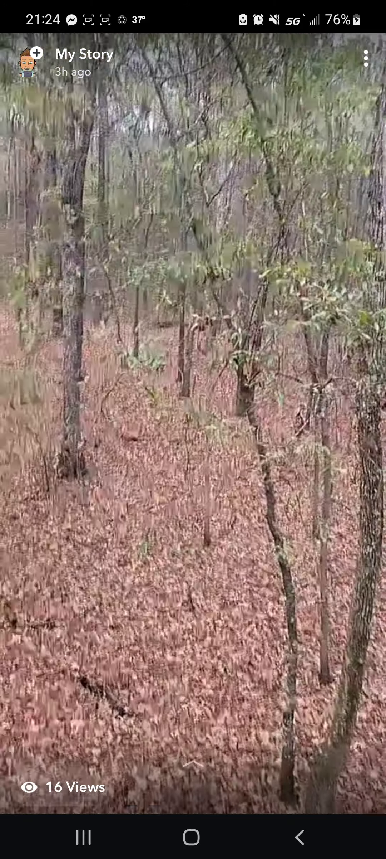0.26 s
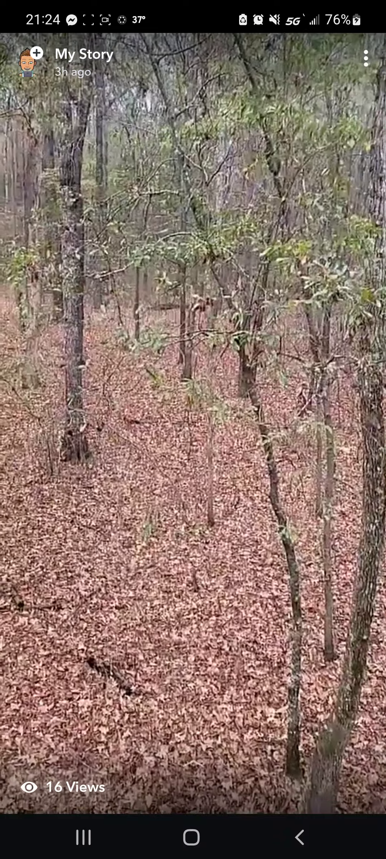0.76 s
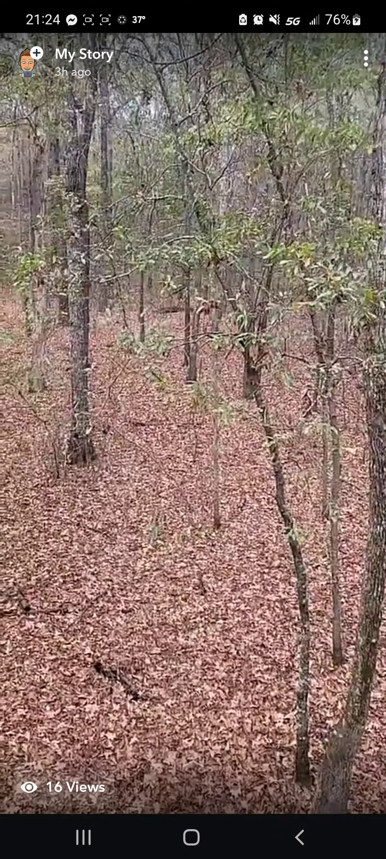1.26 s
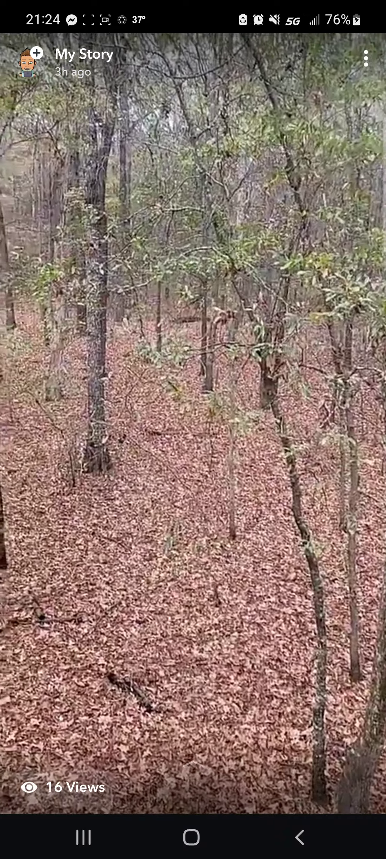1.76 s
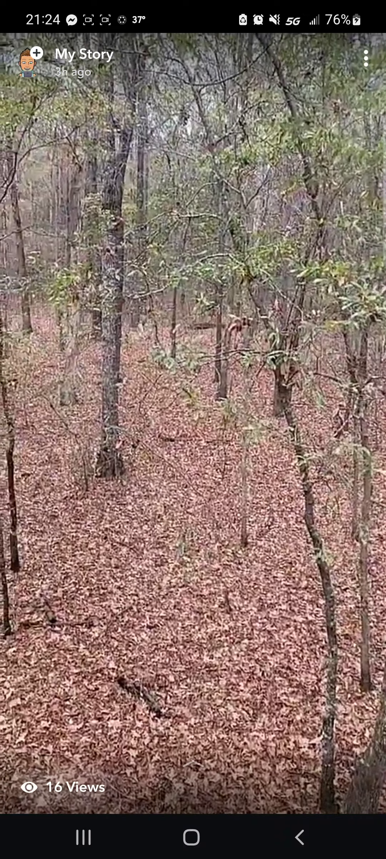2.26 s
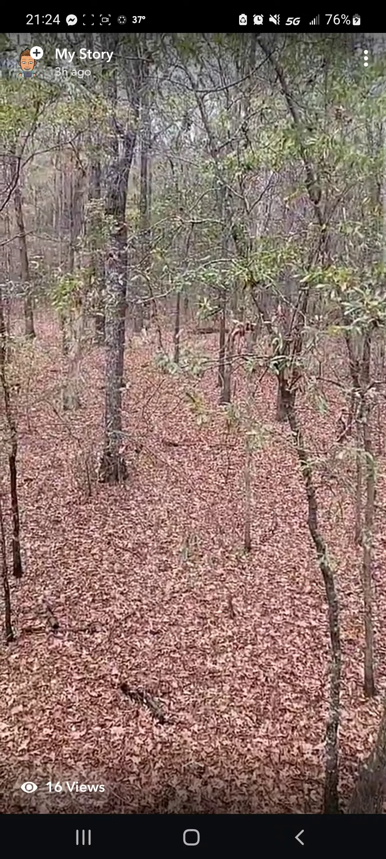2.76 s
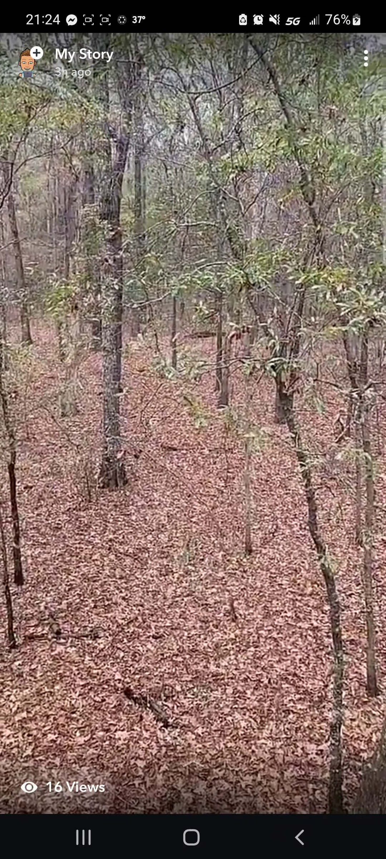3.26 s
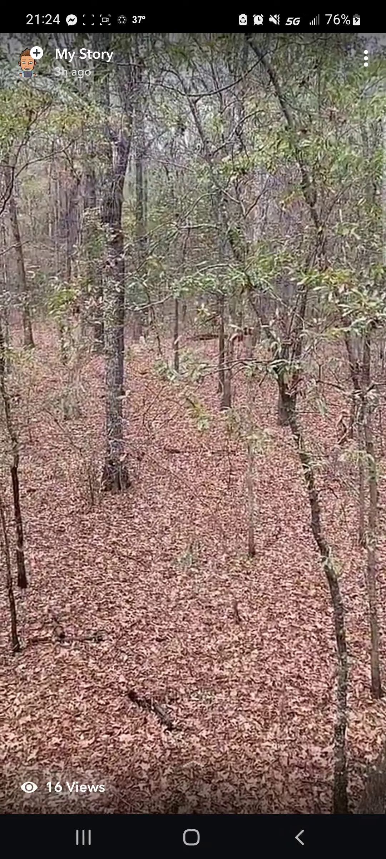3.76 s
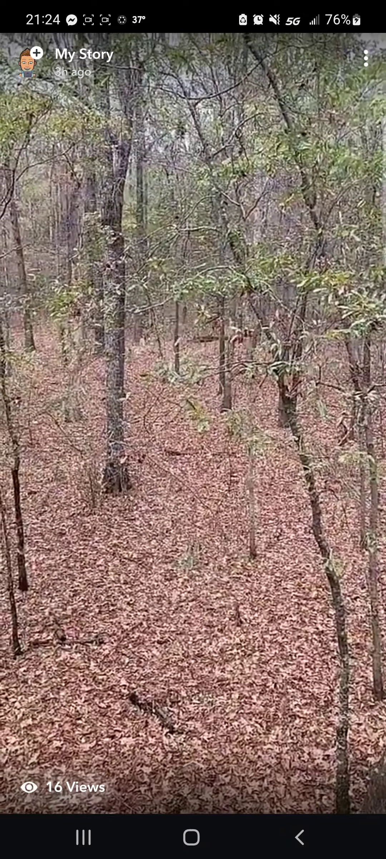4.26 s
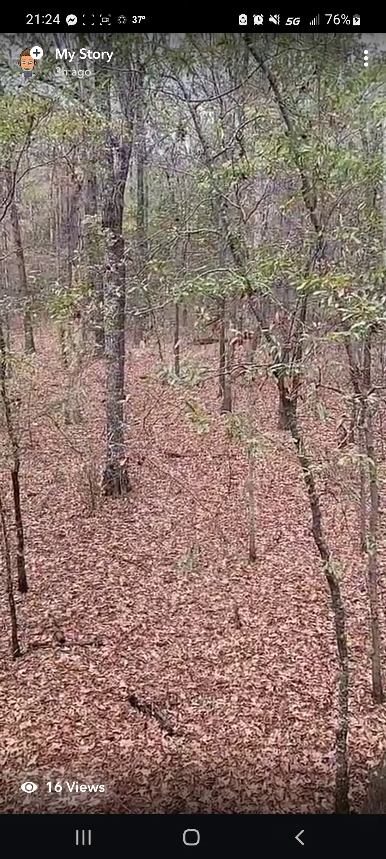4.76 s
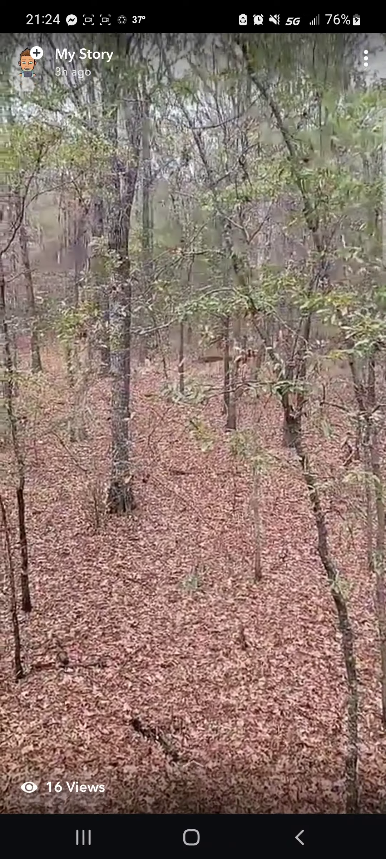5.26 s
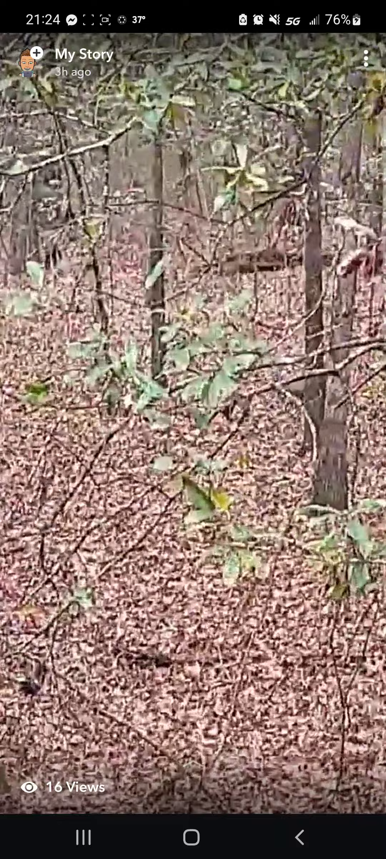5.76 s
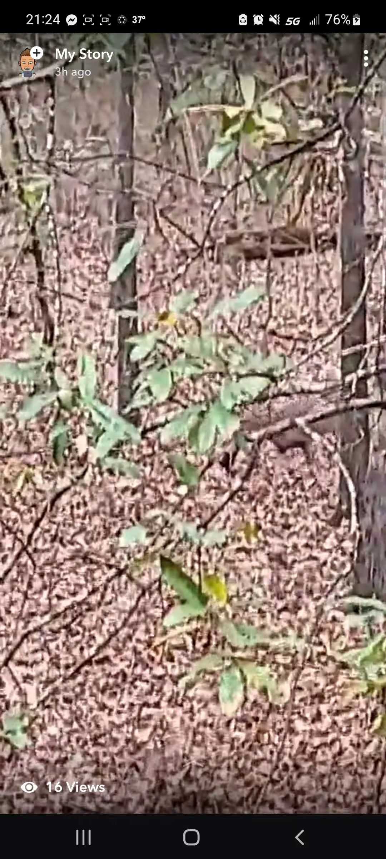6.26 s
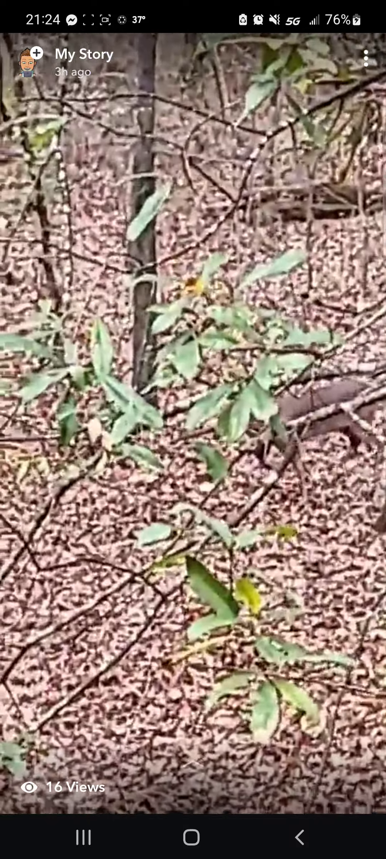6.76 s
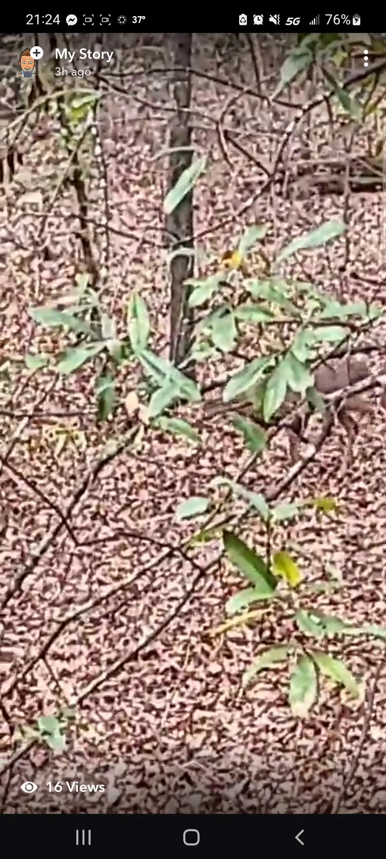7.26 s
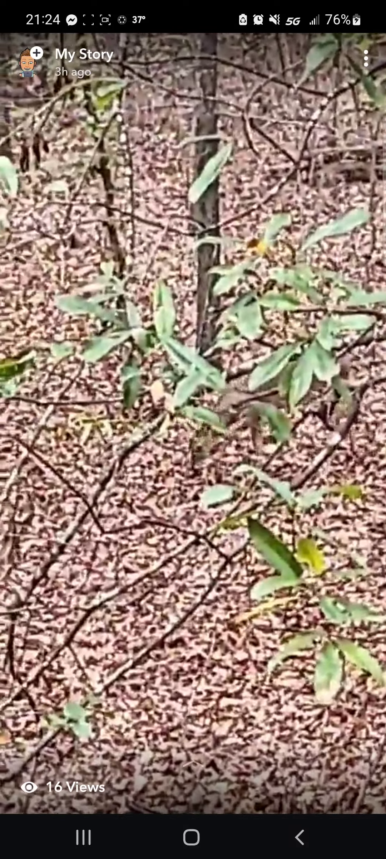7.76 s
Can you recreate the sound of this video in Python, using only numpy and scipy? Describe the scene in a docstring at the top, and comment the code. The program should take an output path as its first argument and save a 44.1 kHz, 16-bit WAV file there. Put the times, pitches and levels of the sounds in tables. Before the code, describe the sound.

After a brief silence, muffled finger taps and rubbing on a hand-held phone open the sound. Then a small animal chips sharply about once a second, seven times, each a very short high whistle with a dropping hook and a diffuse echo from tree trunks. Faint rumble and hiss lie underneath, with slight leaf rustle and a harder cluster of knocks just after five seconds.

```python
"""Sharp chips of a small animal, about one a second in an autumn wood, each with a short scattered tail.
Each chip is a swept sine with overtones and noise puffs; the trunks' echo is a convolution with decaying noise.
Farther whistles and soft hushing bands glide; fingers tap (damped sines and ticks) and rub a hand-held phone.
Dry leaves rustle as uneven noise grains; a far rumble and a faint hiss, both coloured noise, lie underneath.
The sound opens after a silence, with the treble and the full bass joining late."""
import sys
import numpy as np
from scipy import signal
from scipy.fft import rfft, irfft
from scipy.io import wavfile
from scipy.ndimage import uniform_filter1d

SR = 44100
rng = np.random.default_rng(int(sys.argv[2]) if len(sys.argv) > 2 else 0)


def materialize(psi):
    """Save the field psi as 16-bit PCM at rate SR to the path in sys.argv[1].

    A 1-D psi becomes a single channel; in a 2-D psi each row is a channel.
    """
    bounded = np.clip(np.atleast_2d(psi).T, -1, 1)
    quanta = np.round(bounded * 32767).astype(np.int16)
    wavfile.write(sys.argv[1], SR, quanta)


N = 352800


def from_db(db):
    """Amplitude ratio: 20 dB is a factor of ten."""
    return 10 ** (np.asarray(db) / 20)


def rms_one(x):
    """Normalise by mean power: scale to rms 1."""
    return x / np.sqrt(np.mean(x ** 2) + 1e-20)


def colour(x, spectrum):
    """Linear filtering: multiply the spectrum by gains in dB interpolated over log frequency."""
    hz, db = np.transpose(spectrum)
    bin_hz = np.maximum(np.arange(len(x) // 2 + 1) * SR / len(x), 1)
    gain = from_db(np.interp(np.log(bin_hz), np.log(hz), db))
    return irfft(rfft(x) * gain, len(x))


def drift(rate_hz):
    """Low-pass filtered noise: a random wander of rms 1 from two equal poles."""
    pole = np.exp(-2 * np.pi * rate_hz / SR)
    noise = rng.standard_normal(N + SR)
    wander = signal.lfilter([1], [1, -2 * pole, pole * pole], noise)
    return rms_one(wander[SR:])   # the first second lets the filter settle


def glide(start_hz, end_hz, n):
    """Frequency modulation: a sine whose phase sums a geometric pitch sweep."""
    return np.sin(2 * np.pi * np.cumsum(np.geomspace(start_hz, end_hz, n)) / SR)


def add(out, start_s, x):
    """Superposition: mix x into out from a given time."""
    i = round(start_s * SR)
    out[i:i + len(x)] += x[:N - i]


def chips():
    """Swept oscillation: a whistle leaps up, holds with a throb, breaks off and drops into a short hook."""
    # chips: start_s, early_held_hz, late_held_hz, drop_after_s, opening_db, early_held_db, late_held_db,
    # hook_db, overtones_db (before their filters), echo_db (re direct sound)
    chip_calls = [(1.0505, 5530, 5650, .039, -49.5, -62, -50, -41.5, -5.5, 4),
                  (1.961, 5580, 5370, .040, -47, -60, -55, -43.5, -5.5, 3),
                  (3.254, 5860, 5885, .037, -49.5, -55, -49.5, -40.5, -6, 1.5),
                  (4.1203, 5500, 5740, .042, -43, -48, -49, -38, -10, -2),
                  (5.038, 5870, 6010, .039, -46, -45, -54, -39, -7.5, -1),
                  (6.0116, 5160, 5184, .0425, -45.5, -44, -41.5, -42, -13, -6),
                  (7.017, 5820, 6030, .0385, -52, -58, -55, -43, -10, 3.5)]
    # opening: after_start_s, pitch_share (of early held pitch), level_db (re opening)
    opening = [(0, .69, -10), (.0015, .75, 0), (.004, .90, -4), (.006, .965, -10)]
    # closing hook: after_drop_s, pitch_share (of hook pitch), level_db (re hook)
    closing = [(0, 1.25, -11), (.001, 1.13, -4), (.0028, 1.05, -1), (.005, 1.005, -4), (.008, .985, -10),
               (.011, .98, -28)]
    hook_share = .688      # hook pitch re mean held pitch
    break_db = -8          # dip at the break, re late held level
    throb_hz, throb_depth = 102, .5
    snap_db = -11.5        # gain of the mouth clicks' noise, re hook
    hook_echo_db = -8      # opening and hook carry more direct sound and less echo

    out = np.zeros(N)
    open_s, open_share, open_shape_db = np.transpose(opening)
    hook_s, hook_shape, hook_shape_db = np.transpose(closing)
    blur, wander = drift(464), drift(65)
    overtone_band = signal.butter(3, [9900, 12800], "band", fs=SR, output="sos")
    puff_band = signal.butter(4, [1800, 6300], "band", fs=SR, output="sos")
    for start_s, early_hz, late_hz, drop, open_db, early_db, late_db, hook_db, over_db, echo_db in chip_calls:
        # pitch and level follow straight lines between the same knots
        hook_hz = hook_share * (early_hz + late_hz) / 2
        knots = np.r_[open_s, .013, drop - .006, drop - .001, drop + hook_s]
        knot_hz = np.r_[early_hz * open_share, early_hz, late_hz, .97 * late_hz, hook_hz * hook_shape]
        knot_db = np.r_[open_db + open_shape_db, early_db, late_db, late_db + break_db, hook_db + hook_shape_db]
        t = np.arange(round(knots[-1] * SR)) / SR
        first = round(start_s * SR)
        now = slice(first, first + len(t))
        hz = np.interp(t, knots, knot_hz)
        level = from_db(np.interp(t, knots, knot_db))

        # throb: amplitude modulation with an unsteady phase
        held = (t > open_s[-1]) & (t < drop)
        throb = np.sin(2 * np.pi * throb_hz * (t - open_s[-1]) + 2.1 * wander[now])
        level *= 1 + held * throb_depth * throb
        level = uniform_filter1d(level, size=24)

        # only overtones near 11.8 kHz sound; the second is husky
        phase = 2 * np.pi * np.cumsum(hz) / SR
        reach_2, reach_3 = [np.exp(-((k * hz - 11800) / 1300) ** 2) for k in (2, 3)]
        second = reach_2 * blur[now] * np.sin(2 * phase)
        third = reach_3 * (1 + .5 * blur[now]) * np.sin(3 * phase)
        third *= from_db(-5.4 * (t < drop))   # weaker before the drop
        overtones = signal.sosfilt(overtone_band, second + third)
        call = level * (np.sin(phase) + from_db(over_db) * overtones)
        call *= np.minimum(t / .0015, 1)

        # mouth clicks at the opening and at the drop
        snaps = np.exp(-((t - .002) / .0018) ** 2) + np.exp(-((t - drop - .003) / .003) ** 2)
        puff = signal.sosfilt(puff_band, rng.standard_normal(len(t)))
        call += from_db(hook_db + snap_db) * snaps * puff
        add(out, start_s, call)

        # a new head direction lights other trunks, so each call has its own echo level
        unheld = (t > drop) | (t < open_s[-1])
        echo = scatter(call * from_db(hook_echo_db * unheld))
        add(out, start_s, from_db(echo_db) * echo)
    return out


def scatter(x):
    """Multiple scattering: convolve with uneven trunk returns that build up briefly and die; tail energy 1."""
    t60_s, near_t60_s, rise_s = .75, .22, .0046
    near_db = 6   # nearby trunks and ground answer first and louder
    t = np.arange(SR // 2) / SR
    unevenness_db = 2.2 * np.minimum(rng.exponential(1, len(t)), 5)
    returns = rng.standard_normal(len(t)) * from_db(unevenness_db)
    decay = from_db(-60 * t / t60_s) + from_db(near_db - 60 * t / near_t60_s)
    tail = returns * decay * (1 - np.exp(-t / rise_s))
    echo = signal.fftconvolve(x, tail / np.sqrt(np.sum(tail ** 2)))
    return echo * from_db(1.5 * drift(70)[:len(echo)])   # stirring leaves make the returns flicker


def whistles():
    """Direct and scattered sound: faint wavering glides from farther off, with strong echo."""
    # farther whistles: start_s, length_s, start_hz, end_hz, level_db (peak, before the waver)
    far_glides = [(2.10, .11, 6500, 6400, -70), (6.095, .08, 2050, 1500, -62), (6.86, .12, 5500, 5450, -74),
                  (7.97, .05, 6500, 6700, -64)]
    out = np.zeros(N)
    for start_s, length_s, start_hz, end_hz, db in far_glides:
        n = round(length_s * SR)
        swell = np.hanning(n) ** .5 * (1 + .5 * drift(43)[:n])
        tone = from_db(db) * swell * glide(start_hz, end_hz, n)
        add(out, start_s, tone)
        add(out, start_s, from_db(-3) * scatter(tone))
    return out


def taps():
    """Impulse response: each tap is a damped push of the case and a bright snap with a gritty decay."""
    # taps on the phone: start_s, thump_db (before damping), thump_hz, decay_cycles, push_sign,
    # tick_db (before colouring)
    finger_taps = [(0.3679, -22, 260, 1.4, -1, -12.5), (.3705, -46, 2000, 1.5, 1, -25),
                   (.3865, -50, 2000, 1.5, -1, -33), (.4195, -24.5, 500, 1.9, -1, -27),
                   (.4612, -26, 1840, 4.4, -1, -32), (0.5883, -33, 404, 1.3, -1, -56),
                   (0.712, -17, 140, 1.3, -1, -30), (0.753, -44, 400, 1.5, -1, -56),
                   (0.802, -37.5, 300, 1.7, -1, -42), (.873, -66, 2000, 1.5, -1, -46),
                   (0.9262, -66, 2000, 1.5, -1, -39), (5.0247, -14.5, 483, 1.4, -1, -18),
                   (5.0793, -24.5, 470, 2.5, -1, -31), (5.1533, -27, 109, 2.1, 1, -38),
                   (5.1588, -35, 316, 4.9, -1, -41), (5.165, -32.5, 51, 6.5, 1, -64),
                   (5.1939, -35, 500, 0.98, -1, -54), (5.2113, -32, 300, 1.7, -1, -56),
                   (5.4682, -38.5, 670, 2.4, -1, -60), (6.085, -38, 597, 1.4, -1, -42),
                   (6.6198, -31, 580, 1.6, -1, -65), (6.959, -43, 1400, 1.2, -1, -41),
                   (7.8302, -68, 3000, 1.5, -1, -41)]
    # colour of the ticks: frequency_hz, gain_db
    tick_colour = [(300, -9), (1000, -2), (2000, 3.5), (4500, 2), (7000, -8), (8700, -12), (11500, -0.5),
                   (16000, -18)]
    thumps, ticks = np.zeros(N), np.zeros(N)
    t = np.arange(SR // 5) / SR
    for start_s, thump_db, hz, cycles, push, tick_db in finger_taps:
        damping = np.exp(-3 * t * hz / cycles)
        onset = np.minimum(t * hz / .25, 1)   # a quarter cycle
        thump = push * np.sin(2 * np.pi * hz * t) * damping * onset
        add(thumps, start_s, from_db(thump_db) * thump)
        grit = .3 * rng.standard_normal(len(t)) * np.exp(-t / .0005)
        add(ticks, start_s, from_db(tick_db) * ((t == 0) + grit))
    return thumps + colour(ticks, tick_colour)


def rustle():
    """Friction noise: uneven grains, dull for skin on the case and bright for dry leaves, in strokes."""
    # strokes: full_strength_s, rise_20db_s, hold_s, fall_20db_s, dull_rub_db, scrape_db, crisp_treble_db
    strokes = [(.366, .004, .02, .2, -50, -54, -95), (.385, .03, .04, .07, -55, -47, -90),
               (.425, .02, .035, .02, -62, -61, -70), (.48, .03, .02, .45, -67, -65, -74),
               (.705, .06, .03, .2, -58, -56, -66), (.75, .05, .07, .05, -64, -61, -67),
               (2.35, .04, .045, .1, -75, -66, -62), (4.405, .02, .15, .3, -86, -85, -74),
               (4.63, .1, .05, .1, -73, -68, -68), (4.87, .06, .02, .4, -67, -72, -76),
               (4.93, .05, .08, .02, -70, -72, -73), (5.04, .01, .055, .03, -64, -61, -65),
               (5.14, .03, .29, .06, -72, -66, -62), (5.154, .006, .01, .015, -39, -53.5, -61),
               (5.19, .03, .025, .02, -55, -62, -64), (5.29, .12, .05, .12, -60, -62, -54),
               (5.912, .025, .003, .04, -76, -76, -70), (6.9, .15, .06, .12, -74, -67, -77),
               (7.43, .05, .02, .4, -88, -75, -73), (7.70, .07, .02, .1, -76, -66, -68),
               (7.838, .04, .01, .03, -86, -90, -64), (7.97, .14, .03, .05, -69, -76, -63)]
    # spectrum of the dull rub: frequency_hz, density_db (relative, per Hz)
    rub_colour = [(150, -8), (400, 10), (800, 7), (1300, 2), (1700, -23.5), (3000, -36)]
    # spectrum of the scrape: frequency_hz, density_db (relative, per Hz)
    scrape_colour = [(800, -55), (1500, -2.5), (2040, 2.5), (2400, -3.5), (3300, -5.5), (4600, -10),
                     (6800, -11), (8450, -23.5), (11300, -25), (14900, -17), (16000, -33)]
    # spectrum of the crisp leaves: frequency_hz, density_db (relative, per Hz)
    crisp_colour = [(8500, -40), (9800, -12), (10700, -3.5), (11300, -2), (12600, -2), (13400, -12.5),
                    (16000, -18)]
    t, power = np.arange(N) / SR, np.zeros((3, N))
    for full_s, rise_s, hold_s, fall_s, *peaks_db in strokes:
        steps_down = np.maximum((full_s - t) / rise_s, (t - full_s - hold_s) / fall_s)
        stroke = from_db(-20 * np.maximum(0, steps_down))
        power += np.outer(from_db(peaks_db), stroke) ** 2   # overlapping strokes add in power
    rub_gain, scrape_gain, crisp_gain = np.sqrt(power)

    # skin and leaf grains share one unevenness
    unevenness_db = 1.93 * np.minimum(rng.exponential(1, N), 6) + 2.3 * drift(64)
    skin_grains, leaf_grains = rng.standard_normal((2, N)) * from_db(unevenness_db)
    rub = rub_gain * rms_one(colour(skin_grains, rub_colour))
    scrape = scrape_gain * rms_one(colour(skin_grains, scrape_colour))
    crisp = crisp_gain * rms_one(colour(leaf_grains, crisp_colour))
    return rub + scrape + crisp


def hush():
    """Narrow-band noise: a random wander multiplies a glide, so a soft band swells, moves and fades."""
    # soft bands: start_s, length_s, start_hz, end_hz, level_db (swell's peak, re a carrier of amplitude 1)
    soft_bands = [(3.28, .55, 2000, 1450, -66), (3.3, .3, 3300, 2700, -69), (3.9, .2, 1200, 1600, -72),
                  (4.62, .09, 11800, 13000, -71), (4.74, .27, 9500, 10300, -75),
                  (5.34, .07, 4700, 4500, -66)]
    out = np.zeros(N)
    for start_s, length_s, start_hz, end_hz, db in soft_bands:
        n = round(length_s * SR)
        noise = drift(350)[:n]   # sets the bandwidth
        add(out, start_s, from_db(db) * np.hanning(n) ** .5 * noise * glide(start_hz, end_hz, n))
    return out


def wood():
    """Coloured noise: a far rumble, lumpy with light wind on the microphone, and a smoother hiss."""
    # background levels: time_s, rumble_db, hiss_db
    background = [(.22, -60, -74), (.36, -54, -69.5), (.55, -52.5, -68), (1, -52.5, -67.5),
                  (1.8, -51, -65.5), (2.5, -51, -66.5), (3.3, -51.5, -68), (4.2, -53.5, -66.5),
                  (5, -51.5, -66), (5.7, -53.5, -69), (6.2, -51, -66.5), (7, -51, -68), (8, -54, -67.5)]
    # spectrum of the rumble: frequency_hz, density_db (relative, per Hz)
    rumble_colour = [(15, -49), (25, -11.5), (48, 0.5), (86, -3.5), (123, 1.5), (167, -5.5), (216, -4.5),
                     (244, -6.5), (415, -8.5), (460, -15.5), (694, -23), (1500, -35.5), (1950, -41),
                     (3300, -120)]
    # spectrum of the hiss, with a dip near 8.7 kHz and a raised band at 11-13 kHz:
    # frequency_hz, density_db (relative, per Hz)
    hiss_colour = [(700, -53), (1500, -18.5), (1800, -11), (2000, 1.5), (2300, -2.5), (3600, -7.5),
                   (5500, -7.5), (6800, -10), (7600, -20), (8700, -27), (10400, -24), (10900, -15),
                   (12800, -15.5), (13800, -19), (16000, -27)]
    time_s, *columns = np.transpose(background)
    rumble_db, hiss_db = [np.interp(np.arange(N) / SR, time_s, column) for column in columns]
    rumble = rms_one(colour(rng.standard_normal(N), rumble_colour))
    hiss = rms_one(colour(rng.standard_normal(N), hiss_colour))
    return rumble * from_db(rumble_db + drift(4)) + hiss * from_db(hiss_db + 1.1 * drift(9))


def scene():
    """Superposition of all sources, mono."""
    return (chips() + whistles() + hush() + taps() + rustle() + wood())[None]


def record(dry):
    """Band splitting: after a silence the middle opens, then the treble, then the full bass; the top is cut."""
    start_s, treble_start_s, bass_start_s = .223, .423, .52
    cutoff_hz = 15800
    t = np.arange(N) / SR
    below_treble = signal.sosfiltfilt(signal.cheby2(8, 50, 9400, fs=SR, output="sos"), dry)
    deep = signal.sosfiltfilt(signal.butter(3, 80, fs=SR, output="sos"), dry)
    sound_on, treble_on, bass_on = [np.clip((t - s) / .002, 0, 1)
                                    for s in (start_s, treble_start_s, bass_start_s)]
    middle = sound_on * (below_treble - deep)
    treble = treble_on * (dry - below_treble)
    bass = sound_on * np.maximum(bass_on, from_db(-22)) * deep   # weak until its own start
    top_cut = signal.cheby2(16, 60, cutoff_hz + 300, fs=SR, output="sos")
    return signal.sosfilt(top_cut, middle + treble + bass)


dry = scene()
out = record(dry)
materialize(out)
```